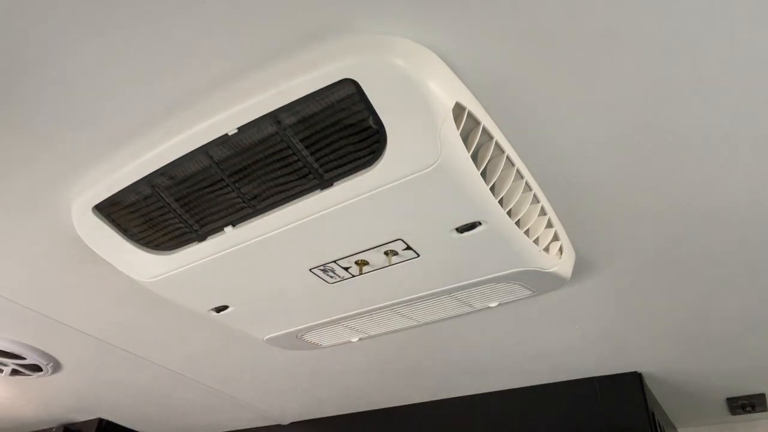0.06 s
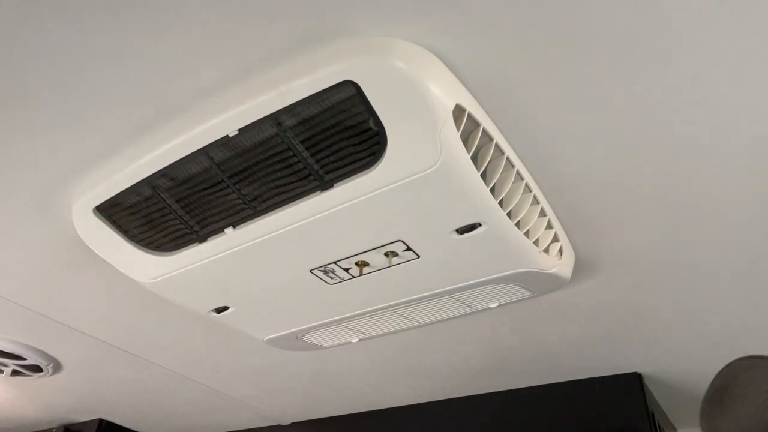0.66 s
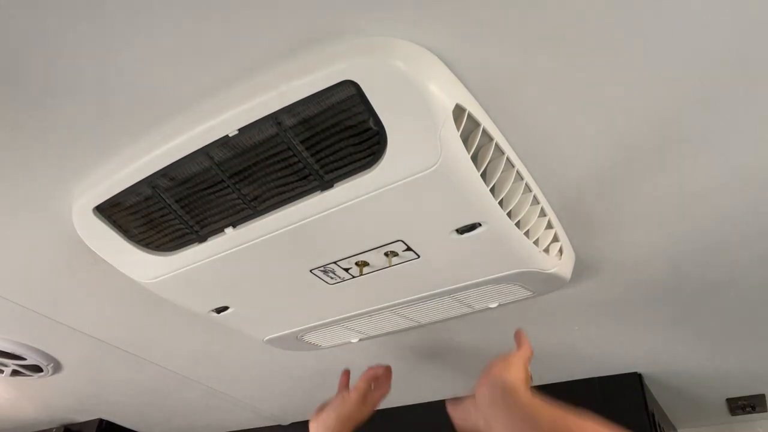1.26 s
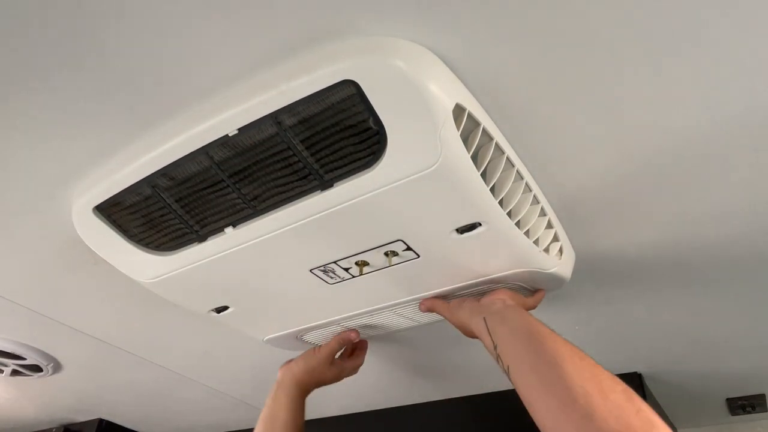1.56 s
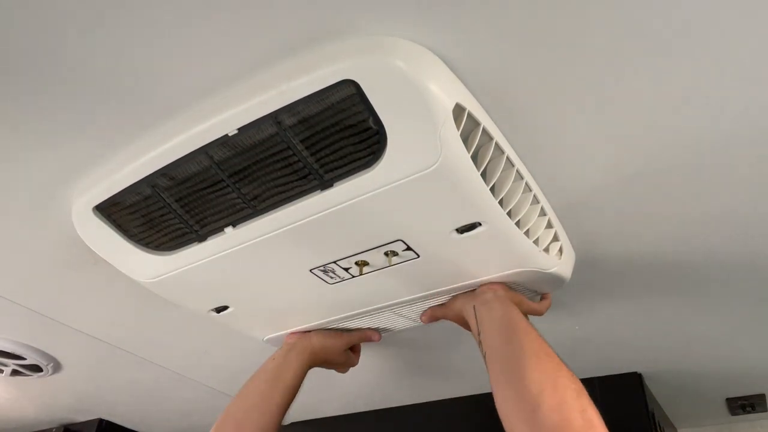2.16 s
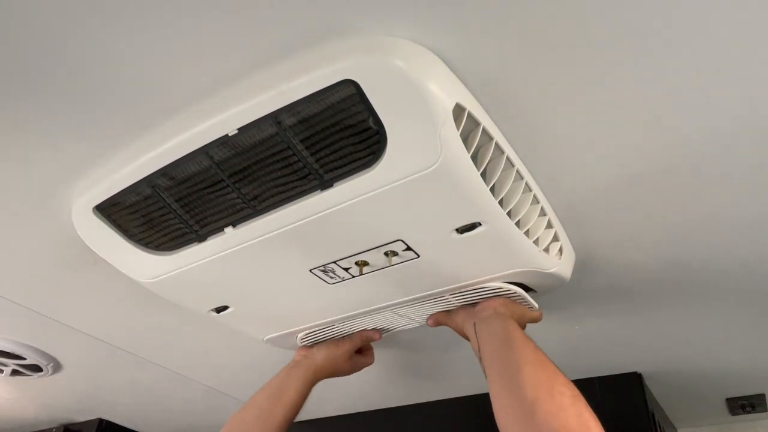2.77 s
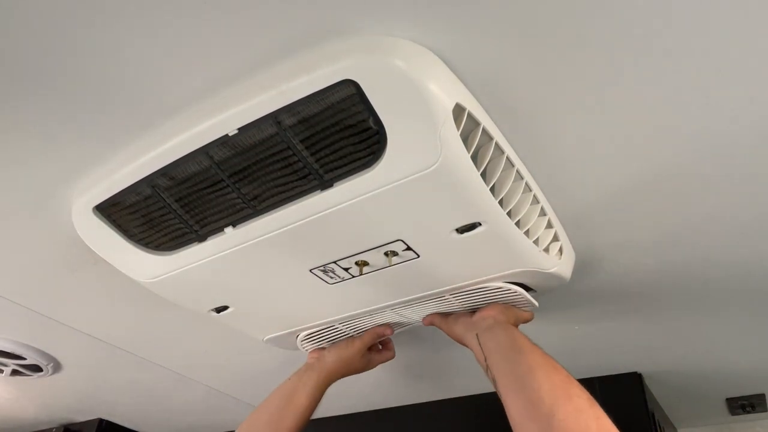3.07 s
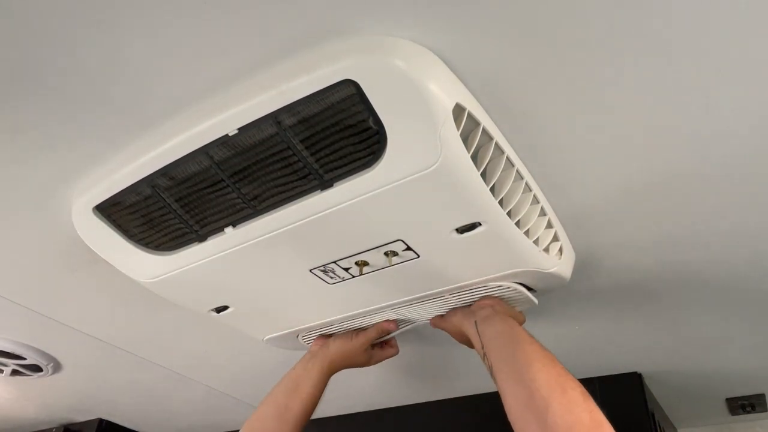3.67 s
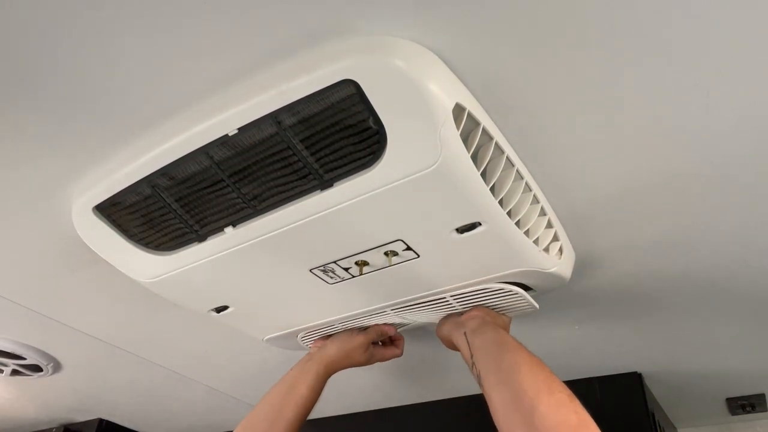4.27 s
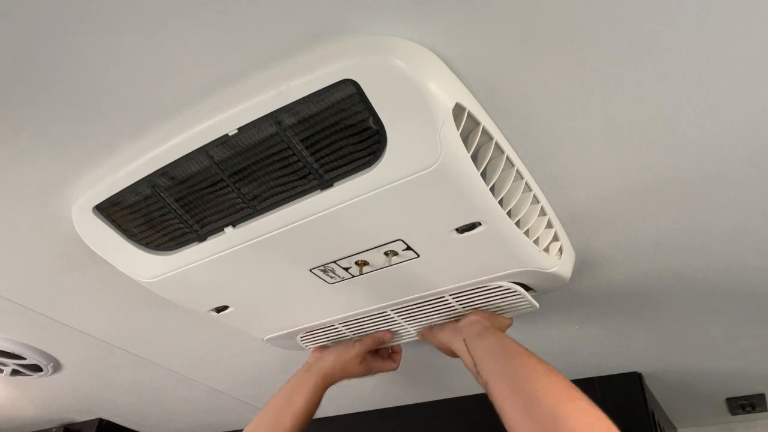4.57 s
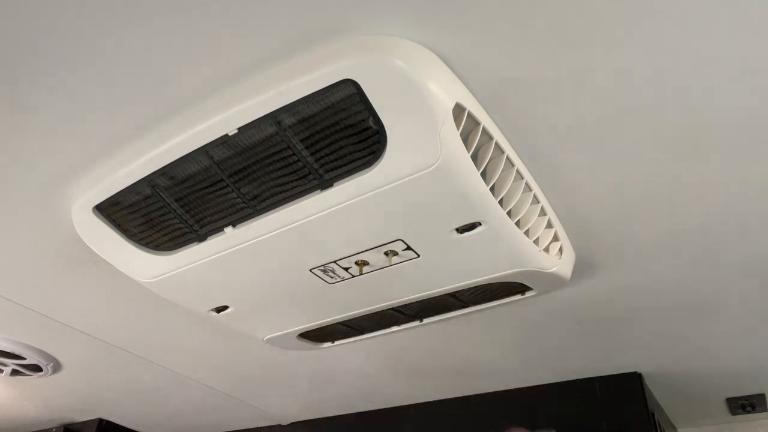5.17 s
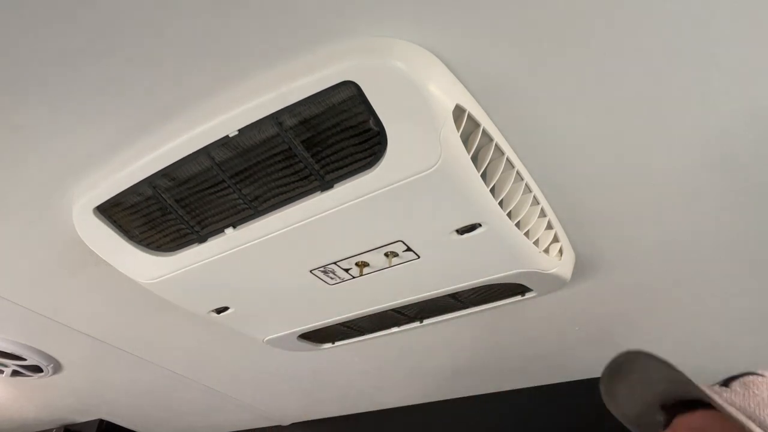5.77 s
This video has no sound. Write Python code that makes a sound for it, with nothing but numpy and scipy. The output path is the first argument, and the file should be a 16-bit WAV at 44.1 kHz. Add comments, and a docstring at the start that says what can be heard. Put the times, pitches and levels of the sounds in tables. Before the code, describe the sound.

Inside a small trailer, a rooftop air conditioner runs steadily with a low rumble, rushing air and a motor hum. About two seconds in, a plastic grille is pried from its ceiling cover: the rim ticks and scrapes, and two catches snap free. Another clicks near four seconds, then the loudest snap knocks the hollow cover. After two faint ticks the unit runs on alone. The stereo microphone is close underneath.

```python
"""Inside a small trailer, a stereo microphone close under the panel of a rooftop air conditioner.
From the start the unit runs steadily: blower rumble, rushing air and a compressor hum.
Near 2 s two hands begin to pry the plastic grille out: its rim ticks and rubs, and catches snap free
at 2.3 and 2.5 s. One more goes at 3.9 s; the loudest, at 4.3 s, knocks the hollow cover hard.
The near walls answer each snap briefly. After two last ticks the unit runs on alone."""
import sys
import numpy as np
from scipy import signal
from scipy.fft import rfft, irfft, next_fast_len
from scipy.io import wavfile

SR = 44100
rng = np.random.default_rng(int(sys.argv[2]) if len(sys.argv) > 2 else 0)


def file_out(sig):
    """Save sig as 16-bit WAV at sys.argv[1]."""
    # one column per channel
    cols = np.atleast_2d(sig).T
    # limit, then scale
    lim = np.clip(cols, -1, 1)
    pcm = np.round(lim * 32767).astype(np.int16)
    wavfile.write(sys.argv[1], SR, pcm)


N = 260631

# catches letting go, close overhead: (time [s], snap level [dB], first crack against rattle [ratio],
# snap tilt [dB/octave], grille ring [dB], cover knock [dB], ceiling thump [dB], spring-back delay [s])
CATCHES = [(2.2803, -19, 3.7, -2.1, -13, -32, -25.5, 0.00096), (2.2894, -25, .9, -7, -23, -32, -23, 0.0009),
           (2.5148, -28, .6, -3, -26, -18, -39, 0.00131), (2.5211, -28, .4, -4.5, -34, -26.5, -48, 0.001),
           (2.532, -33, .4, -8, -30, -28, -30, 0.00102), (3.895, -25.5, 1, -0.7, -28.5, -42, -42, 0.00219),
           (4.3347, -14, 0.6, -2.5, -29, -9, -11.5, 0.0029), (4.3483, -25, .5, -3, -21, -23, -22, 0.00063)]
# modes of the slatted grille: (frequency [Hz], level [dB], t60 [s])
GRILLE_MODES = [(364, -4, 0.049), (446, -4.5, .075), (533, -2.5, 0.054), (607, -6, .06), (700, -3, 0.043),
                (755, -7.5, 0.039), (827, -2, .06), (906, -4, 0.05), (1145, -2.5, .075), (1282, -7, 0.062),
                (1550, -8.5, 0.052), (1976, -19, 0.11), (2310, -19.5, 0.11), (2765, -18.5, 0.059),
                (4006, -18.5, 0.06), (4680, -14, 0.048)]
# modes of the hollow plastic cover: (frequency [Hz], level [dB], t60 [s])
COVER_MODES = [(319, -8.5, 0.073), (410, -14, 0.056), (496, -5.5, 0.075), (565, -5, 0.059),
               (655, -19, .045), (719, 1.5, 0.065), (826, -20, .06), (924, -9.5, 0.055), (1080, -19, .04),
               (1172, -12, .045), (1253, -8.5, 0.046), (1530, -12, 0.046), (1650, -15, 0.055),
               (1800, -20, .05), (1883, -12.5, 0.051), (2350, -27, 0.07), (2610, -19.5, 0.055)]
# low modes of the ceiling behind the cover: (frequency [Hz], level [dB], t60 [s])
CEILING_MODES = [(135, -7.5, 0.15), (169, -2, 0.17), (239, -3.5, 0.12), (280, 1, 0.086)]
def catches(right_db=3.5):
    """Each catch snaps free; the grille springs back, rings, knocks the cover and thumps the ceiling."""
    t, out = np.arange(SR // 3) / SR, np.zeros((2, N))
    pan = amp([[-right_db], [right_db]])  # the knock sits right of the microphone
    low_cut = signal.butter(2, 90, "highpass", fs=SR, output="sos")  # small panels radiate no deep bass
    for start, snap_db, crack, tilt_db, grille_db, cover_db, thump_db, delay in CATCHES:
        grille = amp(grille_db) * ring(GRILLE_MODES, t, swell_s=0.00072)
        cover = amp(cover_db) * ring(COVER_MODES, t, swell_s=0.0015)
        knock = in_cabin(grille + cover, wet_db=-8)
        thump = amp(thump_db) * ring(CEILING_MODES, t, swell_s=0.0024)
        add(out, start + delay, signal.sosfilt(low_cut, pan * knock + thump))
        add(out, start, amp(snap_db) * snap(t, t60=0.032, crack=crack, tilt_db=tilt_db, wet_db=2))
    return out


def snap(t, t60, crack, tilt_db, wet_db, crack_t60=0.0051, grain_db=1.5):
    """Plastic slips past an edge: a first crack, a grainy rattle of the slats, a wash off the walls."""
    crack_rise_s, wash_rise_s, wash_t60 = 0.0002, 0.0028, 0.13
    grains = amp(grain_db * wobble(1500)[:len(t)])
    burst = plastic(diffuse_noise(len(t)) * grains, tilt_db)
    decay = crack * amp(-60 * t / crack_t60) + amp(-60 * t / t60)
    contact = decay * (1 - np.exp(-t / crack_rise_s))
    wash = unit(amp(-60 * t / wash_t60) * (1 - np.exp(-t / wash_rise_s)))
    wash_gain = amp(wet_db) * np.sqrt(np.mean(contact ** 2))
    return burst * np.hypot(contact, wash_gain * wash)


def ring(modes, t, swell_s, detune=0.0058):
    """A struck panel's modes swell and die away, a little differently at every blow."""
    chance = rng.standard_normal((len(modes), 3))
    tones = np.zeros(len(t))
    for (hz, db, t60), (stray_db, bend, phase) in zip(modes, chance):
        decay = amp(db + stray_db - 60 * t / t60)
        tones += decay * np.sin(2 * np.pi * hz * (1 + detune * bend) * t + np.pi * phase)
    return tones * (1 - np.exp(-t / swell_s))


# spectrum of hard plastic snapping at close range: (frequency [Hz], relative level [dB])
PLASTIC_SPECTRUM = [(50, -45), (140, -7), (300, 0), (700, 4), (1900, 4), (3400, -3), (4800, -.7),
                    (6500, -2.7), (8200, -2.7), (10000, -5.5), (11500, -8), (15500, -5.5)]
def plastic(noise, tilt_db):
    """Noise of rms 1 in the colour of hard plastic, tilted by tilt_db an octave."""
    return unit(filtered(noise, lambda hz: amp(along(PLASTIC_SPECTRUM, hz) + tilt_db * np.log2(hz + 1))))


# small contacts along the grille's rim: (time [s], level [dB], tilt [dB/octave])
RIM_TICKS = [(1.9127, -40, 5), (2.024, -29, -3.5), (2.116, -31, -1.5), (2.168, -30.5, -3),
             (2.4168, -28, -3), (2.756, -31, -1.5), (2.825, -32, -10), (2.9104, -37, -1),
             (3.6043, -36.5, -2), (4.0674, -30.5, -1.5), (4.078, -41, .5), (4.339, -22, -3),
             (4.646, -34, -2.5), (4.656, -38, -3)]
def rim_ticks():
    """The rim ticks as the fingers work it loose; each tick has its own brightness."""
    t, out = np.arange(SR // 4) / SR, np.zeros((2, N))
    for start, db, tilt_db in RIM_TICKS:
        add(out, start, amp(db) * snap(t, t60=.022, crack=.8, tilt_db=tilt_db, wet_db=-3))
    return out


# the rim sliding in its seat: (time [s], length [s], level [dB])
RIM_SLIDES = [(2.023, 0.19, -41), (2.163, 0.1, -33), (2.4, 0.054, -36), (2.77, 0.025, -39)]
def rim_slides(attack_s=0.005, release_t60=0.16, slips_per_s=490, slip_db=3.8):
    """With each pull the rim scrapes along its seat, sticking and slipping in quick uneven bursts."""
    t, pressure = np.arange(N) / SR, np.zeros(N)
    for start, length, db in RIM_SLIDES:
        grip = np.clip((t - start) / attack_s, 0, 1)
        release_db = -60 * np.maximum(t - start - length, 0) / release_t60
        pressure += grip * amp(db + release_db)
    slips = diffuse_noise(N) * amp(slip_db * wobble(slips_per_s))
    return pressure * plastic(slips, tilt_db=-5.0)


# rumble of the fan wheel overhead: (frequency [Hz], relative level [dB])
FAN_RUMBLE = [(20, -34), (37, -23), (50, -8), (68, -3.5), (105, -1), (150, -0.5), (185, -7.5), (240, -14.5)]
# air rushing through the louvres: (frequency [Hz], relative level [dB])
AIR_RUSH = [(240, -7), (290, -6.5), (360, 0), (440, -2), (520, -6), (780, -8), (1050, -12.5), (1700, -16),
            (2600, -22), (3800, -28)]
# hiss at the louvre edges: (frequency [Hz], relative level [dB])
EDGE_HISS = [(5500, -33.3), (8300, -35), (9400, -38), (11000, -45.5), (15500, -46.5)]
# duct and cabin resonances: (frequency [Hz], width [Hz], lift [dB])
DUCT_RESONANCES = [(348.4, 15, 3), (392, 12, 2.5), (718.6, 36, 5), (915, 37, -3.5), (956, 65, 6.5),
                   (1078, 35, 2.5), (1143, 9.7, 9), (1241, 33, 6.5), (1440, 74, 1), (1590, 31, 5),
                   (1725, 27, 6.5), (2083, 39, 6), (2160, 80, -2.5)]
def blower(rumble_db=-31.0, rush_db=-29, flutter_db=.5, split_hz=240):
    """The fan wheel rumbles; its air rushes through the duct and flutters at the louvres."""
    def duct_db(hz):
        return sum(db / (1 + (2 * (hz - centre) / width) ** 2) for centre, width, db in DUCT_RESONANCES)
    lowpass_db = lambda hz: -10 * np.log10(1 + (hz / split_hz) ** 12)
    highpass_db = lambda hz: -10 * np.log10(1 + (split_hz / (hz + 1)) ** 12)
    air_spectrum = np.vstack([AIR_RUSH, EDGE_HISS])
    rumble = air_noise(lambda hz: along(FAN_RUMBLE, hz) + lowpass_db(hz))
    rush = air_noise(lambda hz: along(air_spectrum, hz) + duct_db(hz) + highpass_db(hz))
    return amp(rumble_db) * rumble + amp(rush_db + flutter_db * wobble(14)) * rush


# stereo balance where the microphone stands: (frequency [Hz], left minus right [dB])
BALANCE = [(70, -0.5), (140, 3), (250, -3.5), (350, -2.5), (480, 1), (680, -5), (900, -0.5), (1500, -2),
           (3000, -1), (5000, -1.5), (8000, 0)]
def air_noise(level_db):
    """Stereo noise of rms 1; standing waves make some bands louder on one side."""
    response = lambda hz: amp(level_db(hz) + np.outer([.5, -.5], along(BALANCE, hz)))
    return unit(filtered(diffuse_noise(N), response))


# compressor, mains and fan tones from the roof: (frequency [Hz], rms level [dB])
HUM_TONES = [(28.6, -59.5), (58.05, -42.5), (74.7, -46), (84.05, -40.5), (119.9, -37.5), (141.2, -48.5),
             (174, -42.5), (196.5, -54), (225, -51.5), (366, -48)]
def compressor(drift=0.11, waver_db=1.3, wavers_per_s=9):
    """The motors hum through the roof, each tone slightly unsteady in pitch and level."""
    t, out = np.arange(N) / SR, np.zeros((2, N))
    for hz, db in HUM_TONES:
        phase = 2 * np.pi * (hz * t + rng.random()) + drift * hz / 100 * wobble(3.6)
        sides = amp(np.array([[.5], [-.5]]) * along(BALANCE, hz))
        out += sides * np.sqrt(2) * amp(db + waver_db * wobble(wavers_per_s)) * np.sin(phase)
    return out


# reverberation inside the trailer: (frequency [Hz], t60 [s])
CABIN_DECAY = [(100, 0.5), (300, 0.22), (1000, 0.12), (5000, 0.135), (15000, 0.12)]
def in_cabin(x, wet_db):
    """A short sound reaches the microphone directly, then as dense echoes off the close walls."""
    hz, t, bands = signal.stft(diffuse_noise(SR // 3), SR, nperseg=256)
    decay = amp(-60 * t / along(CABIN_DECAY, hz)[:, None])
    tail = signal.istft(bands * decay, SR, nperseg=256)[1]
    tail = np.pad(tail / np.linalg.norm(tail[0]), ((0, 0), (SR // 700, 0)))  # 1.4 ms late
    echoes = signal.fftconvolve(np.atleast_2d(x), tail, axes=1)[:, :x.shape[-1]]
    return x + amp(wet_db) * echoes


# likeness of the microphone's two sides: (frequency [Hz], correlation [-1 to 1])
CORRELATION = [(80, .999), (150, .89), (240, .66), (360, .94), (600, .28), (1250, .46), (1900, .04),
               (3000, -.14), (5200, 0), (7500, .9), (11000, -.7), (14500, .85)]
def diffuse_noise(samples):
    """White noise as the cabin's sound field: left and right alike in the bass, less so higher up."""
    angle = lambda hz: np.arccos(np.clip(along(CORRELATION, hz), -1, 1)) / 2
    pair = rng.standard_normal((2, samples))
    mid, side = filtered(pair, lambda hz: np.array([np.cos(angle(hz)), np.sin(angle(hz))]))
    return np.array([mid + side, mid - side])


def amp(db):
    """Decibels to gain."""
    return 10 ** (np.asarray(db) / 20)


def unit(x):
    """Scale to rms 1."""
    return x / np.sqrt(np.mean(x ** 2) + 1e-20)


def along(points, hz):
    """Read (frequency, value) points on a log frequency axis."""
    freqs, values = np.transpose(points)
    return np.interp(np.log(hz + 1), np.log(freqs + 1), values)


def wobble(rate):
    """A smooth random curve, rate knots a second."""
    return signal.resample(rng.standard_normal(int(N * rate / SR) + 4), N)


def filtered(x, response):
    """Multiply the spectrum of x by response(hz)."""
    n = x.shape[-1]
    size = next_fast_len(n + 8192)
    return irfft(rfft(x, size) * response(np.fft.rfftfreq(size, 1 / SR)), size)[..., :n]


def add(track, start, sound):
    """Mix a sound in at start seconds."""
    part = track[:, round(start * SR):][:, :sound.shape[-1]]
    part += sound[..., :part.shape[-1]]


def scene():
    """Under the ceiling panel: the running unit and the hands at its grille."""
    return blower() + compressor() + catches() + rim_ticks() + rim_slides()


def record(dry, peak_limit=.9, top_hz=16000):
    """The camera's microphone channel rounds off the highest peaks and cuts the top treble."""
    rounded = dry / (1 + np.abs(dry / peak_limit) ** 6) ** (1 / 6)
    return filtered(rounded, lambda hz: np.clip((top_hz - hz) / 600 + .5, 0, 1))


dry = scene()
out = record(dry)
file_out(out)
```